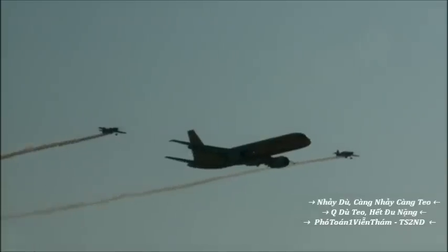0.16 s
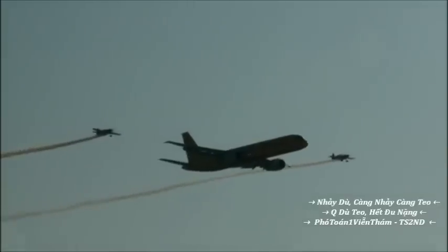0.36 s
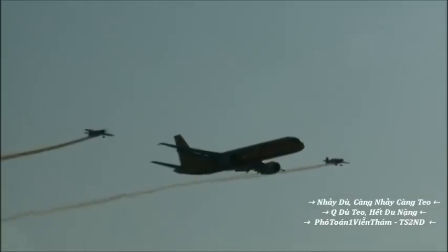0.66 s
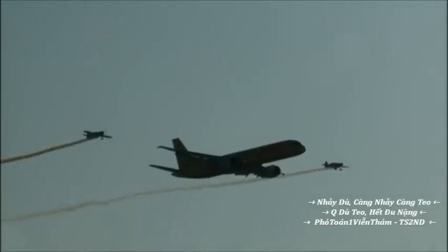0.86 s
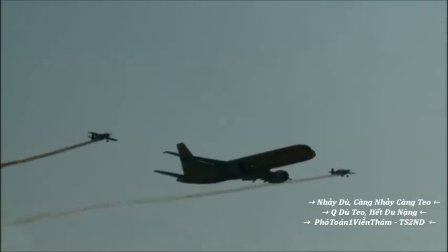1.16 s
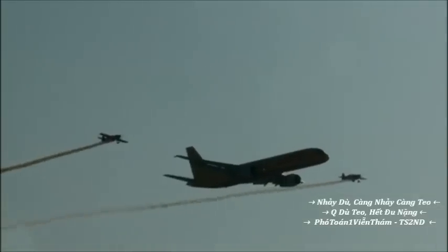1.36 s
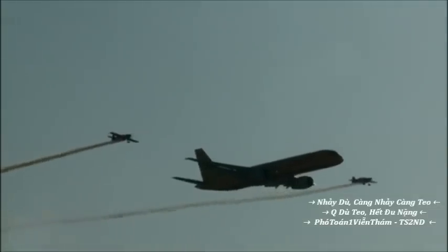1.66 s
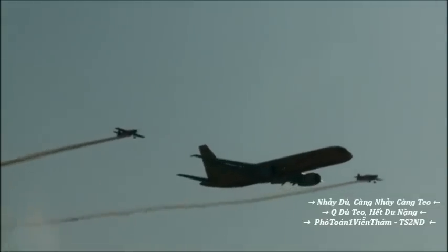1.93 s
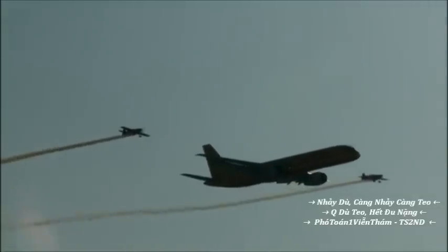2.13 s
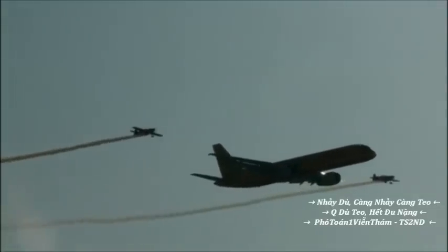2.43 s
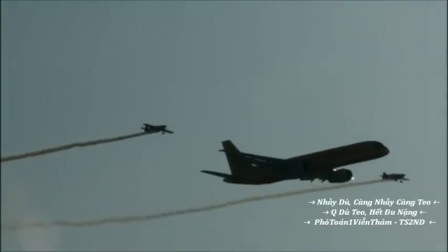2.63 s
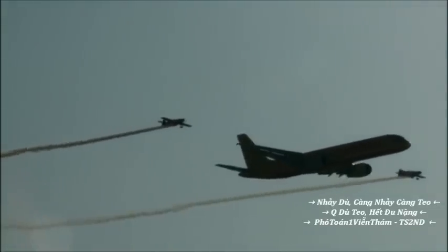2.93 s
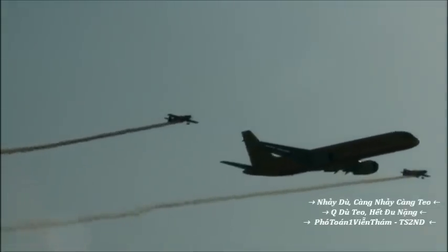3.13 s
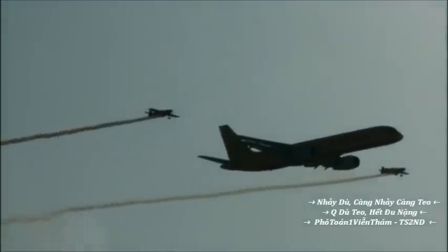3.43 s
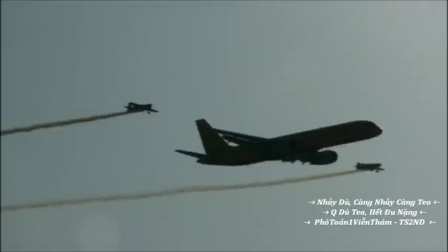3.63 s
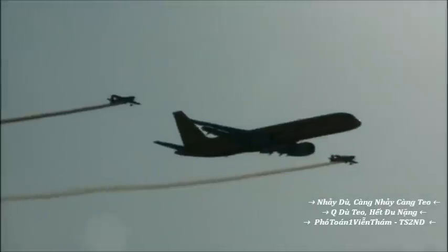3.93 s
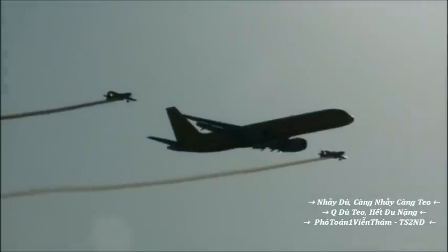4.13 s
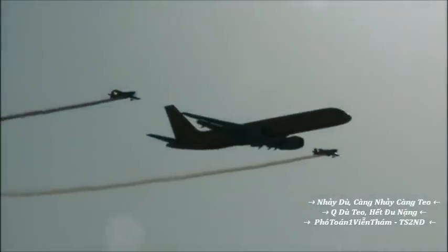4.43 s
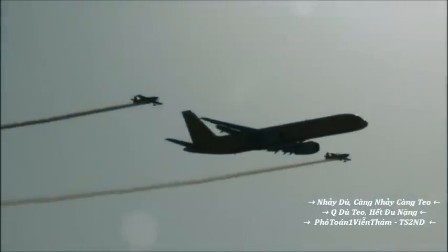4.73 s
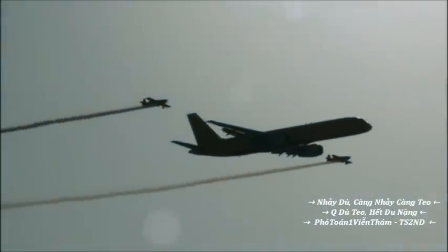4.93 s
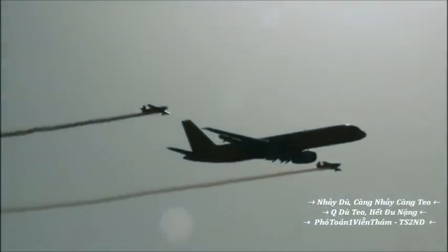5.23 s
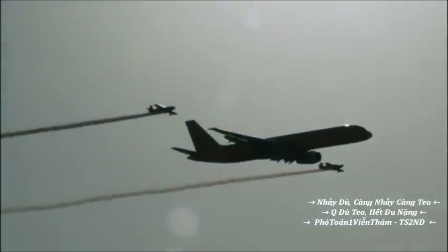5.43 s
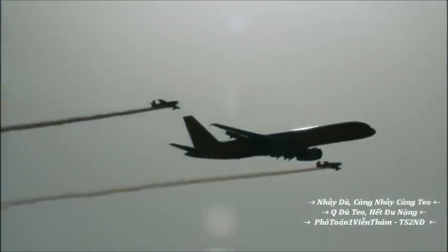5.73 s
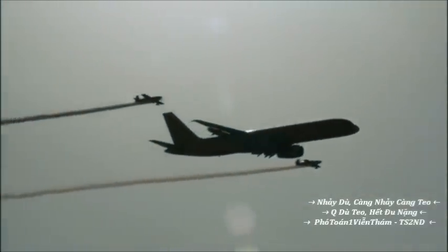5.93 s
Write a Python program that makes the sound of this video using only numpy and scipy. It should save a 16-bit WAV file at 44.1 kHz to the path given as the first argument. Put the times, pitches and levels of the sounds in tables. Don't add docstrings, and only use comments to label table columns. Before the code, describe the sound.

Outdoors at an airfield, jets recede from the microphone. Their exhaust starts as a loud, tearing, overloaded crackle, then sinks within a second or two to uneven low rumble with hollow thumps. Faint turbine hiss and whine slowly rise behind it. Around 4.6 seconds the sound switches abruptly to close idling turbines: low combustion rumble, airy howl, two piercing high tones and soft wind buffeting.

```python
import sys
import numpy as np
from scipy import signal
from scipy.fft import rfft, irfft
from scipy.io import wavfile
from scipy.ndimage import uniform_filter1d

SR = 44100
rng = np.random.default_rng(int(sys.argv[2]) if len(sys.argv) > 2 else 0)


def materialize(psi):
    bounded = np.clip(np.atleast_2d(psi).T, -1, 1)
    quanta = np.round(bounded * 32767).astype(np.int16)
    wavfile.write(sys.argv[1], SR, quanta)


def rack_gain(trim_db):
    fader = np.asarray(trim_db, float)
    return 10 ** (fader / 20)


N = 267687
T = np.arange(N) / SR
F = np.fft.rfftfreq(N, 1 / SR)
CUT_S = 4.609


def unit(x):
    return x / np.sqrt(np.mean(np.abs(x) ** 2))


def columns(table):
    s, *rest = np.transpose(table)
    return [np.interp(T, s, c) for c in rest]


def walk(rate):
    k = int(SR / rate)
    steps = np.repeat(rng.standard_normal(N // k + 1), k)
    return unit(uniform_filter1d(uniform_filter1d(steps, k), k)[:N])


def swells(rows, hz=1.0):
    total = 0
    for s, half, db, *centre in rows:
        reach = sum((np.log2(c / hz) / 0.81) ** 2 for c in centre)
        total = total + db * np.exp(-((T - s) / half) ** 2 - reach)
    return total


def band_rms(shape, lo, hi):
    return np.sqrt(np.sum(shape[(F > lo) & (F < hi)] ** 2) / len(F))


def turbulent(spectrum, anchors, swell_db, flicker_db, rate):
    hz, db = np.transpose(spectrum)
    shape = rack_gain(np.interp(np.log(F + 1), np.log(hz), db))
    noise = rfft(rng.standard_normal(N)) * shape
    centres = [np.log2(lo * hi) / 2 for lo, hi, _ in anchors]
    gains_db = [c - 20 * np.log10(band_rms(shape, lo, hi)) for lo, hi, c in anchors]
    out, swell = np.zeros(N), swell_db * walk(rate)
    for octave in np.arange(3, 14.3, 1 / 3):
        window = np.clip(1 - 3 * np.abs(np.log2(F + 1) - octave), 0, 1)
        share = [np.interp(octave, centres, row) for row in np.eye(len(anchors))]
        level_db = sum(a * g for a, g in zip(share, gains_db)) + swell + flicker_db * walk(rate)
        if window @ shape > 1e-5 * shape.sum():
            out += irfft(noise * window, N) * rack_gain(level_db)
    return out


def tone(hz, width, steady):
    spread = 1 / (1 + (2 * np.fft.fftfreq(N, 1 / SR) / width) ** 2)
    noise = rng.standard_normal(N) + 1j * rng.standard_normal(N)
    scatter = unit(np.fft.ifft(np.fft.fft(noise) * spread))
    steady = np.clip(steady, 0, 1)
    return np.sqrt(2) * (np.sqrt(steady) + np.sqrt(1 - steady) * scatter) * np.exp(2j * np.pi * hz * T)


def gain_rise():
    return 8.5 * (T / CUT_S) ** 2.53


# time in seconds, pitch in Hz.
ECHO_PEAK = [
    (0, 658),
    (.9, 716),
    (1.5, 830),
    (2.2, 866),
    (2.9, 880),
    (3.2, 820),
    (3.55, 840),
    (4.0, 857),
    (4.6, 700),
]


def via_ground(x, share, rough_hz):
    peak_hz = columns(ECHO_PEAK)[0]
    late = np.interp(T - 1 / uniform_filter1d(peak_hz, size=4000), T, x)
    late = signal.sosfiltfilt(signal.butter(1, rough_hz, fs=SR, output="sos"), late)
    return (x + share * late) / np.sqrt(1 + share ** 2)


def steepen(x, s_per_unit, air_hz):
    sharp = np.interp(T, np.maximum.accumulate(T + s_per_unit * x), x)
    return signal.sosfilt(signal.butter(2, air_hz, fs=SR, output="sos"), sharp)


# centre in Hz, start level in dB, total fade in dB, fade time in seconds.
ROAR_FADES = [
    (45, -51.5, -14, 1.2),
    (154, -23.5, -25, 2.1),
    (420, -27.5, -19, 1.68),
    (700, -28, -18.5, 0.94),
    (1520, -41, -17, 1.53),
]
# time in seconds, half length in seconds, lift in dB, centre in
# Hz.
ROAR_PATCHES = [(0.017, 0.062, -13, 120), (0.214, 0.016, 3.5, 150), (1.03, 0.073, -2.5, 1060),
                (1.27, 0.25, 4, 1700), (3.8, 0.022, -9, 800), (3.75, 0.43, -5, 170), (4.2, .1, -2, 1700),
                (0.098, 0.023, 5.5, 760), (.33, 0.066, 12.5, 780), (0.193, 0.017, 0.5, 620),
                (0.453, 0.057, 7, 720), (0.603, 0.073, 7.5, 750), (0.554, 0.071, -0.5, 730),
                (0.752, 0.079, 7.5, 950), (0.76, .04, 0.5, 1500), (3.44, 0.07, 9.5, 230),
                (4.22, 0.11, 3.5, 350), (4.76, 0.51, 3.5, 1500), (2.6, 0.12, 1, 240), (6.4, 0.14, 2, 220),
                (0.88, 0.096, -5.5, 310), (1.86, .1, -2, 450), (0.12, 0.082, -3.5, 390),
                (1.055, 0.079, -4, 160), (0.095, 0.02, 2, 1700), (2.23, .15, -4, 310),
                (0.905, 0.082, -6, 150), (1.18, 0.35, 10.5, 150), (1.7, 0.017, 3, 460),
                (1.84, 0.092, 8, 750), (2.06, 0.028, 3.5, 170), (2.204, 0.32, 9.5, 780),
                (2.3, 0.047, 5.5, 820), (2.76, 0.17, 3.5, 840), (3.11, 0.23, 2.5, 190),
                (3.1, 0.35, -0.5, 610), (3.603, 0.18, 6.5, 630), (3.8, 0.19, 5.5, 650),
                (4.04, 0.03, 8.5, 800), (4.35, 0.037, 6.5, 150), (4.46, 0.038, 4.5, 700),
                (0.14, 0.092, -1, 230), (.62, 0.023, 4, 1800), (1.57, .025, 2.5, 1200),
                (0.684, 0.044, -1, 1300), (0.85, .06, -1, 1400), (2.5, 0.046, -3, 2000)]


def roar_levels():
    return [db + fade_db * (1 - np.exp(-T / fade_s)) + 0.75 * gain_rise() + swells(ROAR_PATCHES, hz)
            for hz, db, fade_db, fade_s in ROAR_FADES]


# frequency in Hz, level in dB per Hz.
ROAR_SPECTRUM = [(15, -62), (25, -63), (60, -51), (145, -7), (215, 3), (320, -0.5), (450, -3.5), (800, -14),
                 (1280, -25.5), (1900, -33), (3100, -43), (4500, -53), (6000, -66), (9900, -120)]


def receding_roar(levels_db):
    deep_db, low_db, valley_db, mid_db, high_db = levels_db
    anchors = [(24.8, 74.0, deep_db), (98.4, 234, low_db), (351, 570, valley_db),
               (414, 1230, mid_db + 0.16), (1165, 1480, high_db + 0.32)]
    roar = turbulent(ROAR_SPECTRUM, anchors, 0.68, 1.95, rate=25)
    return steepen(via_ground(roar, 0.6, rough_hz=1770), 0.0009, air_hz=4060)


# time in seconds, peak in dB, front thickness in ms.
SHOCKS = [(.0199, -19, .07), (.1005, -30, .035), (.1092, -13.5, .052), (.1154, -15, .058), (.797, -25, .1),
          (.152, -23, .09), (.1675, -20.5, .08), (.198, -19, .09), (.2174, -17.5, .05), (.2588, -20, .045),
          (.2835, -22, .06), (.3186, -21, .1), (.3205, -19, .06), (.3244, -20, .05), (.3397, -13.5, .035),
          (.3414, -15, .07), (.3437, -16, .045), (.3454, -16, .06), (.3549, -18, .045), (.3658, -17.5, .08),
          (.3703, -23, .03), (.3836, -18, .055), (.3876, -21, .04), (.428, -21, .045), (.509, -22, .08),
          (.617, -20, .11), (.2693, -21, .1), (.2925, -24, .08), (.3045, -24, .08), (.310, -19.5, .09),
          (.3505, -23, .1), (.397, -22, .08), (.4252, -21, .09), (.472, -25, .1), (.916, -20, .25),
          (1.566, -21, .25), (1.848, -20, .25), (2.243, -23, .25), (2.6174, -24.5, .06),
          (.0015, -26, 0.07), (.0125, -33, .11), (.031, -29, .11), (.041, -29, .11),
                 (.065, -28, .13), (.075, -28, .1), (.0865, -31, .1), (.093, -30, .1), (0.1337, -18, .09),
                 (0.1427, -21, 0.09), (0.1617, -28, 0.1), (.2285, -28, .12), (.2635, -17, 0.092),
                 (.277, -26, 0.11), (.2985, -25, 0.091), (.314, -26, 0.087), (0.3346, -26, 0.1),
                 (.3575, -20, .09), (.376, -19, .12), (.391, -20, .11), (.404, -27, .11), (0.432, -26, .1),
                 (.44, -32, .12), (.4665, -27, .12)]


def crackle(roar_db):
    out, ms = np.zeros(N), np.arange(-200, 201) * 1000 / SR
    small_db = -1.5 + np.minimum(3.5 * rng.exponential(size=N), 6) + roar_db + 1.24 * (roar_db + 24.5)
    small = (rng.random(N) < 560 / SR) * rack_gain(small_db)
    ground = rng.standard_normal(len(ms))
    smear = np.exp(-np.where(ms > 0, ms, -3 * ms) / 2.7)
    smear = rack_gain(-5) * smear / np.linalg.norm(smear)
    for k, (s, db, front_ms) in enumerate(SHOCKS):
        front = np.tanh(ms / front_ms / 0.95) * np.exp(-(np.hypot(ms, front_ms) - front_ms) / 0.21)
        front = front + np.convolve(front, smear * np.roll(ground, 37 * k), "same")
        i = int(s * SR) - 200
        out[max(i, 0):i + len(ms)] -= rack_gain(db - 0.5) * front[max(-i, 0):]
    front = np.tanh(ms / 0.14) * np.exp(-(np.hypot(ms, 0.1) - 0.1) / 0.18)
    front = front + 0.5 * np.convolve(front, smear * ground, "same")
    return out - signal.fftconvolve(small, front, "same")


# start in seconds, peak in dB, pitch in Hz.
THUMPS = [(0.014, -24, 680), (0.038, -26, 686), (0.064, -22, 684), (0.074, -19, 680), (0.086, -22, 666),
          (0.097, -13.5, 678), (0.107, -16.5, 685), (0.141, -28, 680), (0.192, -22, 636), (0.274, -21, 685),
          (0.283, -18, 700), (0.306, -21, 700), (0.318, -18, 677), (0.334, -19, 680), (0.347, -16.5, 700),
          (0.356, -18, 700), (0.438, -27, 700), (0.258, -24, 703), (0.422, -26, 613), (0.463, -19, 800),
          (0.5, -17, 685), (0.584, -18, 727), (0.654, -34, 616), (0.753, -23, 678), (0.824, -26, 684),
          (0.915, -21.5, 664), (1.079, -27, 736), (1.285, -32.5, 686), (1.43, -32, 715),
          (1.565, -23.5, 754), (1.611, -26.5, 790), (1.847, -23, 851), (1.911, -29.5, 830),
          (2.068, -24, 716), (2.122, -26, 810), (2.203, -22.5, 794), (2.242, -24, 900), (2.289, -29, 820),
          (2.442, -43, 750), (2.514, -25.5, 815), (2.6153, -27.5, 723), (2.681, -36, 856),
          (2.758, -28, 834), (3.494, -27, 785), (3.536, -24, 780), (3.574, -37, 830), (3.624, -43, 880),
          (3.674, -25, 600), (4.203, -23, 673), (4.269, -32, 660)]


def thumps():
    out, t = np.zeros(N), np.arange(2000) / SR
    rough = uniform_filter1d(rng.standard_normal((len(THUMPS), len(t))), size=60, axis=1) * 8
    shape = (1 - np.exp(-t / 0.0016)) * np.exp(-t / 0.0068)
    shape = shape / shape.max()
    for (s, db, hz), air in zip(THUMPS, rough):
        i = int(s * SR)
        out[i:i + len(t)] += rack_gain(db - 5) * shape * (1 + 0.31 * air) * np.sin(2 * np.pi * hz * t)
    return signal.sosfilt(signal.butter(4, 2500, fs=SR, output="sos"), out)


# frequency in Hz, level in dB per Hz.
PARKED_HISS = [(1500, -32), (2500, -19), (3740, -5), (4460, -9.5), (7300, -13), (8050, -8.5), (9300, -24),
               (11500, -24), (12200, -19), (12600, -48), (14300, -45), (14700, -37), (15800, -30)]
PARKED_PITCHES = [1896, 3682, 3757, 4074, 4209, 4749, 5578, 8096, 12146]
# level over the hiss in dB, width in Hz, steady share from 0 to 1.
PARKED_BLADES = [
    (-4, 24, .5),
    (-11, 80, .1),
    (-7.5, 45, .76),
    (-16, 12, .7),
    (-16.5, 18, .65),
    (-15, 90, .1),
    (-15, 40, .2),
    (-6, 18, .72),
    (-19, 50, .1),
]
# time in seconds, half length in seconds, lift in dB.
HUM_LIFTS = [
    (2.3, 0.5, 7),
    (3.3, 0.24, 8),
    (4.45, 0.42, 7),
]
# time in seconds, half length in seconds, lift in dB.
WHINE_LIFTS = [
    (.7, 0.18, 4),
    (1.5, .3, 3),
    (2.25, 0.28, 3.5),
    (2.85, 0.44, 8.5),
    (3.5, 0.26, 4),
    (4.45, 0.27, 6.5),
]
# time in seconds, half length in seconds, lift in dB.
LATE_LIFTS = [
    (2.307, .4, -3.5),
    (3.303, .1, 9),
    (4.093, 0.37, 7),
]
# time in seconds, half length in seconds, lift in dB.
SIDE_LIFTS = [
    (1.4, 0.36, 3),
    (2.0, 0.44, 11),
    (2.7, .25, 4),
    (4.3, 0.42, 4),
]
# time in seconds, half length in seconds, lift in dB.
WHISTLE_LIFTS = [
    (.6, .2, 3),
    (1.3, 0.18, 2.5),
    (2.15, 0.13, 8.5),
    (2.55, .2, 2.5),
    (3.15, 0.087, 2),
    (3.4, 0.12, 7.5),
    (4.03, 0.13, 6),
]


def parked_turbines():
    parked_db = -65 + gain_rise()
    hiss = turbulent(PARKED_HISS, [(4450, 8500, parked_db - 2.5)], 1.0, 0.48, rate=16)
    lifts = {0: HUM_LIFTS, 2: WHINE_LIFTS, 3: LATE_LIFTS, 4: SIDE_LIFTS, 7: WHISTLE_LIFTS}
    whine = np.zeros(N)
    for k, (hz, (db, width, steady)) in enumerate(zip(PARKED_PITCHES, PARKED_BLADES)):
        level_db = db + 0.61 * walk(12.0) + swells(lifts.get(k, []))
        whine += rack_gain(level_db) * tone(hz, width, steady).real
    return hiss + rack_gain(parked_db) * whine


def flypast():
    levels_db = roar_levels()
    shocks = via_ground(crackle(levels_db[3]), 0.22, rough_hz=6000)
    return receding_roar(levels_db) + shocks + parked_turbines()


COMPRESSOR_PITCHES = [6158, 7111.5]
# width in Hz, steady share from 0 to 1, skirt in dB, skirt width in Hz, octave in dB.
COMPRESSOR_TONES = [
    (30, 0.95, -7, 280, -28.5),
    (32, 0.62, -1, 260, -32),
]
# time in seconds, level in dB.
FIRST_LEVEL = [
    (4.62, -55),
    (4.648, -52),
    (5.132, -37.5),
    (5.59, -56.5),
    (5.638, -43.5),
    (5.854, -48),
    (5.874, -62),
    (5.946, -44),
    (6.06, -55),
]
# time in seconds, level in dB.
SECOND_LEVEL = [
    (4.62, -50.5),
    (4.956, -55),
    (5.064, -44),
    (5.394, -54),
    (5.442, -59),
    (5.798, -46.5),
    (5.818, -57.5),
    (5.982, -43.5),
    (6.06, -43),
]
# time in seconds, half length in seconds, lift in dB.
FIRST_LIFTS = [(4.67, 0.023, 6), (4.78, 0.074, 4), (4.91, 0.027, 3.5), (4.955, 0.013, -7),
               (5.19, 0.023, -4), (5.23, .02, 4), (5.31, 0.029, 3.5), (5.38, .03, -5), (5.48, .04, 7.5),
               (5.68, .025, 3.5), (5.73, .02, -9), (5.83, .03, 5), (6.0, .03, 1)]
# time in seconds, half length in seconds, lift in dB.
SECOND_LIFTS = [
    (4.75, .02, -2),
    (4.81, .04, 4),
    (5.12, .03, 1),
    (5.27, .03, -1),
    (5.36, .04, 6),
    (5.58, .04, 3),
    (5.65, .03, 3),
    (5.71, .02, 0),
    (5.755, .015, -4),
    (5.9, .03, 2),
]


def compressors():
    out = np.zeros(N)
    levels, lifts = [FIRST_LEVEL, SECOND_LEVEL], [FIRST_LIFTS, SECOND_LIFTS]
    for hz, row, level, lift in zip(COMPRESSOR_PITCHES, COMPRESSOR_TONES, levels, lifts):
        width, steady, skirt_db, skirt_hz, octave_db = row
        blade = tone(hz, width, steady) + rack_gain(skirt_db) * tone(hz, skirt_hz, 0)
        octave = 0.88 * blade ** 2 + tone(2 * hz, skirt_hz, 0)
        level_db = columns(level)[0] + swells(lift) + 2.0 + 0.26 * walk(5.17)
        out += rack_gain(level_db) * (blade + rack_gain(octave_db) * octave).real
    return out


SIDE_PITCHES = [1897, 3385, 4241, 5885]
# level in dB, width in Hz, steady share from 0 to 1.
SIDE_TONES = [
    (-64, 15, 0.9),
    (-57, 45, 0.2),
    (-64, 35, .2),
    (-61, 16, .4),
]


def side_tones():
    return sum(rack_gain(db) * tone(hz, width, steady).real
               for hz, (db, width, steady) in zip(SIDE_PITCHES, SIDE_TONES))


# frequency in Hz, level in dB per Hz.
COMBUSTION = [(12, -47), (20, -10.5), (195, -2.5), (233, 2), (354, -6.5), (424, -4.5), (755, -24),
              (1160, -22.5), (1500, -28.5), (1950, -57), (3300, -120)]
# frequency in Hz, level in dB per Hz.
INTAKE = [(1500, -10), (2050, -7), (2550, 4), (3150, -9), (4000, -13), (6600, -11.5), (8400, -22),
          (12000, -31), (16000, -46)]
# time in seconds, half length in seconds, lift in dB.
WIND_GUSTS = [
    (4.69, 0.027, 12),
    (5.0, 0.01, 13),
    (5.09, 0.042, 24),
    (5.225, 0.039, 25),
    (5.35, 0.035, -12),
    (5.49, 0.035, 20),
    (5.74, 0.03, 16),
    (5.81, 0.061, 20),
    (6.02, 0.061, 17),
]
# time in seconds, half length in seconds, lift in dB.
RUMBLE_LIFTS = [
    (4.62, .02, 4),
    (5.1, .03, -0.5),
    (5.45, .12, 1.5),
]
# time in seconds, half length in seconds, lift in dB.
ROAR_LIFTS = [
    (4.65, .1, 1.5),
    (5.3, 0.2, 2.5),
    (5.85, .08, 1),
    (6.0, .06, 0),
]
# time in seconds, half length in seconds, lift in dB.
HOWL_LIFTS = [
    (4.63, 0.04, -2.5),
    (4.95, .08, 2),
    (5.25, 0.047, -2.5),
    (5.4, .08, -0.5),
    (5.95, 0.24, -5),
]
# time in seconds, half length in seconds, lift in dB.
HOWL_SWIRLS = [
    (4.65, .08, -1),
    (5.4, .45, 5),
    (5.08, .05, 1),
    (5.28, .07, 2.5),
    (5.62, 0.093, 2.5),
    (5.78, .05, 4),
    (6.04, .05, 1.5),
]
# time in seconds, half length in seconds, lift in dB.
HISS_LIFTS = [
    (5.1, 0.28, 1.5),
    (5.4, 0.072, 0.5),
    (5.7, 0.11, 4.5),
    (5.97, 0.11, -1),
]
# time in seconds, half length in seconds, lift in dB.
TREBLE_LIFTS = [
    (5.33, 0.12, 5.5),
    (5.65, 0.31, 5),
    (5.97, 0.021, 4),
]


def idle_air():
    spectrum = COMBUSTION[:-3] + [(hz, db - 13) for hz, db in INTAKE]
    since_cut = T - CUT_S
    anchors = [(20.2, 177, -48 + swells(WIND_GUSTS)),
               (127, 324, -27.5 - 0.5 * since_cut + swells(RUMBLE_LIFTS)),
               (600, 1230, -44 + 4 * since_cut + swells(ROAR_LIFTS)),
               (2030, 2670, -37 + swells(HOWL_LIFTS)),
               (2840, 4000, -44.5 + swells(HOWL_SWIRLS)),
               (4200, 6300, -46.5 + swells(HISS_LIFTS)),
               (7900, 11000, -57 + swells(TREBLE_LIFTS))]
    return turbulent(spectrum, anchors, 0.6, 1.6, rate=14)


def idling():
    return compressors() + side_tones() + idle_air()


def scene():
    after = np.clip((T - CUT_S) / 0.0025, 0, 1)
    return ((1 - after) * flypast() + after * idling() + thumps())[None]


def low_pass(x):
    return signal.sosfilt(signal.butter(12, 15980, fs=SR, output="sos"), x)


def record(dry):
    limit = 0.205
    mix = dry / (1 + np.abs(dry / limit) ** 6) ** (1 / 6)
    return low_pass(mix)


dry = scene()
out = record(dry)
materialize(out)
```